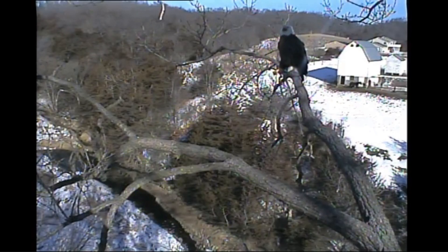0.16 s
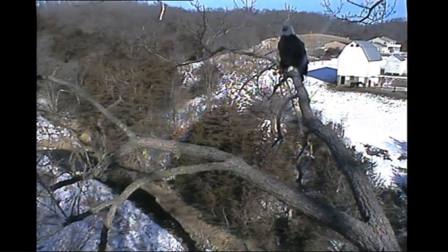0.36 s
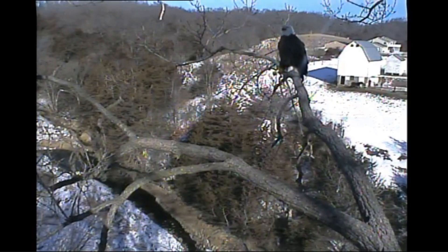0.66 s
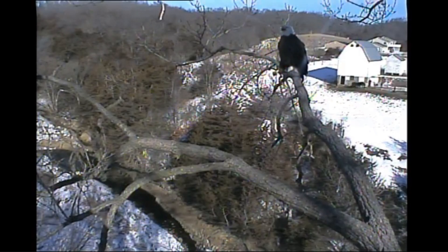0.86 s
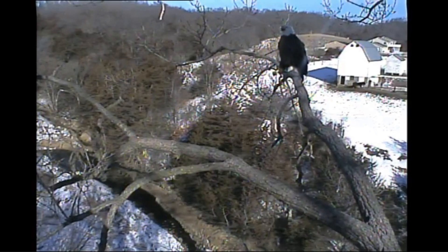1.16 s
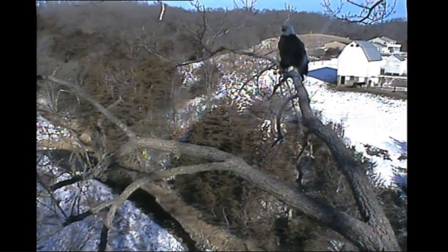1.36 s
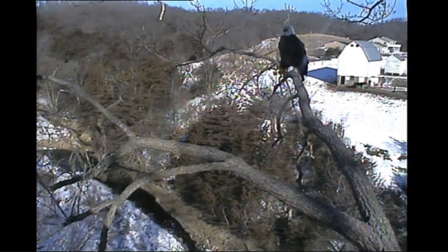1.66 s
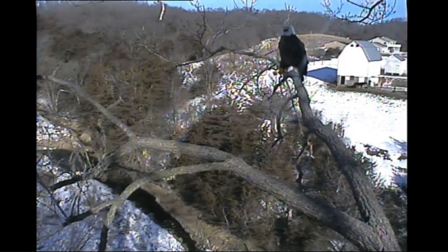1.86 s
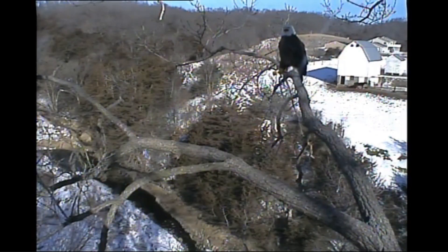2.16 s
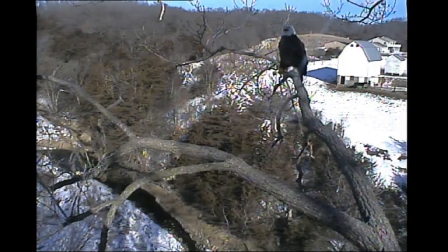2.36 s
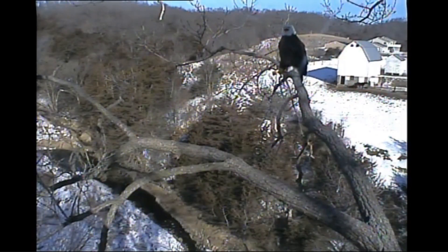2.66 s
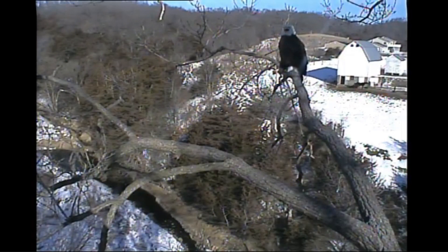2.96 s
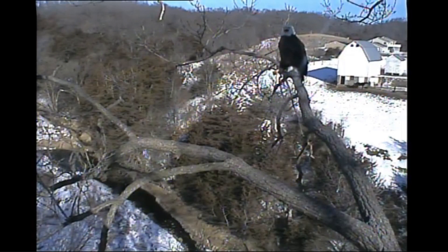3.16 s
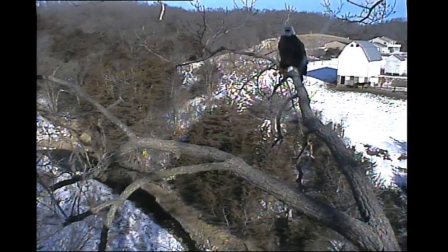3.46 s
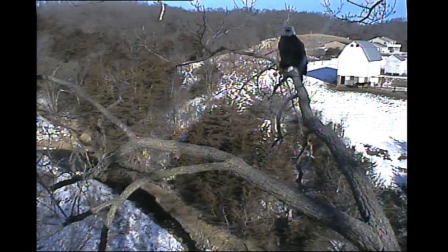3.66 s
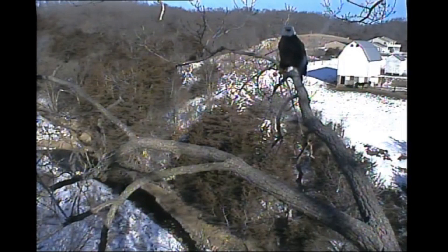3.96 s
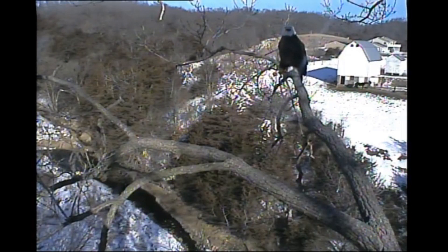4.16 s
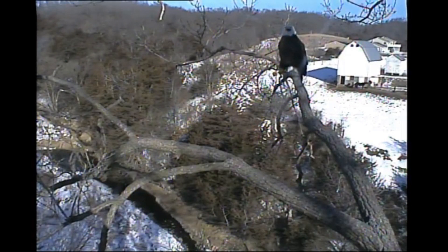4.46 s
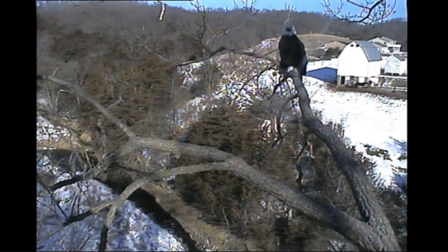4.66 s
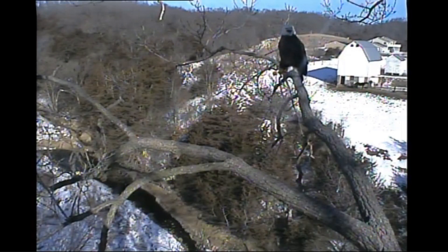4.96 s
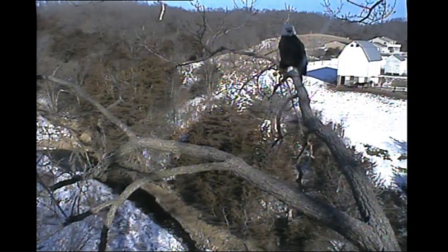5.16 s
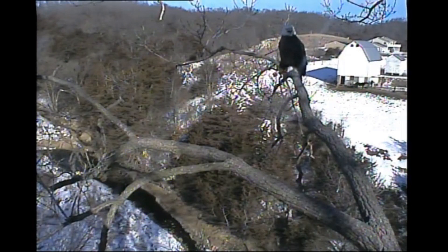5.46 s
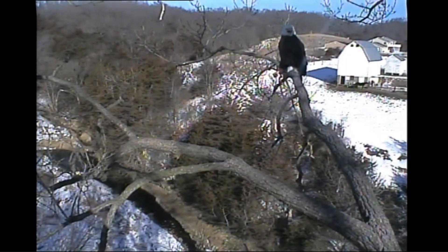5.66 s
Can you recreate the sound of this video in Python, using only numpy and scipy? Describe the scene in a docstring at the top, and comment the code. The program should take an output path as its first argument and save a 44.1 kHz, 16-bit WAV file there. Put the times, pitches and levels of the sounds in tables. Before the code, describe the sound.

An eagle pipes three quick, falling series of shrill notes over a faint outdoor rush and electrical buzz.

```python
"""Eagle on a high branch.

Three falling series of piping notes, with soft whines, peeps and twig ticks between them.
In the forced notes the voice flips between registers; the tree and the wooded valley answer.
A nest camera's microphone overloads on the notes and adds mains buzz and a thin whistle
to the far rush of the valley."""
import sys
import numpy as np
from scipy import signal
from scipy.fft import rfft, irfft, next_fast_len
from scipy.io import wavfile
from scipy.ndimage import uniform_filter1d, map_coordinates

SR = 44100
rng = np.random.default_rng(int(sys.argv[2]) if len(sys.argv) > 2 else 0)


def generate_wav(sig):
    """Save sig (samples, or channels by samples) to the path in sys.argv[1] as 16-bit PCM at SR."""
    pcm = np.round(np.clip(np.atleast_2d(sig).T, -1, 1) * 32767).astype(np.int16)
    wavfile.write(sys.argv[1], SR, pcm)


N = 255780

# plain low piping notes: start_s, length_s, fade_s, pitch_hz, level_db, rasp_db
PLAIN_NOTES = [(0.0, .009, .004, 3260, -18, -37), (.067, .013, .005, 3230, -17, -43),
               (1.003, .027, .016, 3550, -10, -28), (1.438, .034, .016, 3470, -6.5, -21.5),
               (1.545, .025, .007, 3390, -7.5, -23), (1.652, .013, .009, 3210, -8, -31),
               (3.144, .032, .008, 3380, -9, -26), (3.267, .02, .009, 3240, -8, -26),
               (3.382, .014, .01, 3190, -8, -31), (4.975, .036, 0, 3320, -9, -24),
               (5.11, .02, .01, 3230, -9, -25), (5.249, .014, .007, 3160, -8, -30),
               (5.377, .015, 0, 3060, -9, -30)]
# forced notes that flip between registers:
# start_s, flipping_s, hold_s, drop_s, fade_s, held_hz, level_db, rasp_db, squeal_db
FORCED_NOTES = [(1.1, .032, .017, 0, 0, 4360, -7, -21.5, -12),
                (1.209, .034, .017, 0, 0, 4360, -6, -21, -12),
                (1.322, .02, .018, 0, 0, 4480, -6.5, -22, -13),
                (2.665, .006, .032, .013, 0, 4260, -6.5, -23.5, -18),
                (2.78, .034, .018, 0, 0, 4310, -6, -21.5, -10),
                (2.899, .02, .017, 0, .014, 4440, -5.5, -21.5, -12),
                (3.018, .005, .016, .017, .022, 4340, -7, -22.5, -17),
                (4.466, .022, .035, 0, 0, 4120, -8.5, -27, -22),
                (4.589, .033, .018, 0, 0, 4290, -5.5, -21, -8),
                (4.713, .019, .019, .014, 0, 4440, -6, -22, -14),
                (4.845, .004, .017, .016, .009, 4330, -6, -22.5, -18)]
# rasp of the voice: freq_hz, density_db
RASP_SPECTRUM = [(40, 11.5), (130, 6.5), (500, 10.5), (1200, 2.5), (2500, 3.5), (4000, 15), (5500, -1),
                 (6900, 12), (7800, 1)]
# echoes off near limbs and the ground: delay_s, t60_s, level_db
NEAR_ECHOES = [(.004, 0.036, -15), (.06, 0.1, -36.5)]
# decay of the woods' echo: freq_hz, t60_s
WOODS_DECAY = [(200, 0.33), (3200, 0.48), (4500, 0.45), (7000, 0.18)]
# colour of the woods' echo: freq_hz, gain_db
WOODS_COLOUR = [(300, -37), (2500, 2), (3150, -1), (3550, 4.5), (4300, -6), (4900, 7), (5500, -13.5),
                (7500, 3.5)]
# soft falling whines: start_s, length_s, start_hz, end_hz, level_db, tilt_db_per_overtone
WHINE_NOTES = [(0, .085, 750, 640, -35.5, -.5), (.6, .37, 935, 660, -38.5, .5),
               (1.8, .33, 950, 660, -38.5, 0), (5.36, .33, 815, 585, -43, -1.5)]
# throat resonances: freq_hz, gain_db
THROAT_COLOUR = [(600, -10), (860, -2), (1200, -16), (1700, -11), (2200, -11), (2750, 1), (3400, -3),
                 (4200, -16), (5200, -16), (6500, -28)]
# far wind and traffic: freq_hz, density_db
VALLEY_SPECTRUM = [(25, -9), (70, -3), (140, -10.5), (280, -3), (520, -1), (800, -4), (1200, -13),
                   (1800, -21), (2700, -21), (3800, -21.5), (5200, -24), (7800, -26)]
# colour of the mains spikes: freq_hz, gain_db
BUZZ_COLOUR = [(200, -44), (1500, -15), (4000, -9), (6200, 9.5), (7800, -14.5)]
# twig cracks: start_s, level_db
TWIG_TICKS = [(.121, -35), (2.283, -23.5), (4.451, -31), (5.535, -35)]
# faint husky peeps: start_s, length_s, pitch_hz, level_db
PEEP_NOTES = [(0.194, 0.073, 3800, -54), (0.592, 0.043, 4040, -48.5), (1.743, 0.016, 3110, -41),
              (2.413, 0.075, 3700, -55), (2.59, 0.038, 3430, -46), (3.787, 0.048, 3840, -57),
              (3.826, 0.028, 3200, -53.5), (4.15, 0.051, 4160, -48.5), (4.283, 0.067, 3650, -52.5),
              (4.392, 0.019, 1310, -43), (5.752, 0.012, 1160, -39.5)]

FADE_DB, FADE_RASP_DB = -8, -22.5  # soft end of a note, relative to its tone and rasp


def amp(db):
    """Decibels to gain."""
    return 10 ** (np.asarray(db) / 20)


def unit(x):
    """Scale to rms 1."""
    return x / np.sqrt(np.mean(x ** 2) + 1e-20)


def along(points, hz):
    """Read (freq_hz, value) points on a log axis."""
    freq_hz, values = np.transpose(points)
    return np.interp(np.log(hz + 1), np.log(freq_hz + 1), values)


def filtered(x, response):
    """Apply a frequency response."""
    size = next_fast_len(N + SR // 2)
    return irfft(rfft(x, size) * response(np.fft.rfftfreq(size, 1 / SR)), size)[:N]


def coloured(x, spectrum):
    """x shaped by a spectrum, rms 1."""
    return unit(filtered(x, lambda hz: amp(along(spectrum, hz))))


def noise(spectrum):
    """Coloured noise, rms 1."""
    return coloured(rng.standard_normal(N), spectrum)


def wobble(rate_hz):
    """Smooth random curve, rate_hz knots a second."""
    knots = rng.standard_normal(int(N * rate_hz / SR) + 4)
    return map_coordinates(knots, [np.arange(N) * rate_hz / SR])


def smooth(x, width_s):
    """Round the corners of a control."""
    size = max(1, int(width_s * SR))
    return uniform_filter1d(uniform_filter1d(x, size), size)


def phase_of(hz):
    """Running phase of a pitch curve."""
    return 2 * np.pi * np.cumsum(hz) / SR


def span(start_s, length_s):
    """Sample indices of an event, and its course u from -1 to 1."""
    at = np.arange(max(0, int(start_s * SR)), min(N, int((start_s + length_s) * SR)))
    return at, np.linspace(-1, 1, len(at))


def held_tone(start_s, length_s, hz, db, rasp_db, sag_per_s=0, arch_s=.018):
    """A held tone breaks into equal pitch arches: start_s, length_s, pitch_hz, level_db, rasp_db."""
    count = max(1, round(length_s / arch_s))
    step_s = length_s / count
    return [(start_s + k * step_s, step_s, hz * (1 - sag_per_s * step_s * (k - (count - 1) / 2)),
             db, rasp_db) for k in range(count)]


def plain_note(start_s, length_s, fade_s, hz, db, rasp_db, catch_s=.0035, catch_db=-17, sag_per_s=1.3):
    """Low register: a catch, a sagging tone, a soft end."""
    catch = (start_s, catch_s, hz * 1.1, db + catch_db, rasp_db + catch_db / 2)
    hold = held_tone(start_s + catch_s, length_s - catch_s, hz, db, rasp_db, sag_per_s)
    end_hz = hz * (1 - sag_per_s * length_s / 2)
    fade = (start_s + length_s, fade_s, end_hz, db + FADE_DB, rasp_db + FADE_RASP_DB)
    return [catch, *hold, fade]


def forced_note(start_s, flipping_s, hold_s, drop_s, fade_s, hz, db, rasp_db, squeal_db,
                onset_s=.0055, flip_s=.014, high_ratio=1.24, low_hz=3416):
    """A squeal, flips between middle and high registers, a held tone, sometimes a drop to the low one."""
    flips = max(0, round((flipping_s - onset_s) / flip_s))
    squeal_s = onset_s if flips else flipping_s
    squeal_hz = 5270 + 349.1 * flips  # more flips, forced higher
    burst_db = rasp_db + 6 + .7 * (squeal_db - db)
    arches = [(start_s, squeal_s, squeal_hz, squeal_db, burst_db)]
    for k, (early, sharp) in enumerate(rng.standard_normal((flips, 2))):
        period_s = (flipping_s - squeal_s) / flips
        at_s = start_s + squeal_s + k * period_s
        middle_s = period_s * np.clip(1 - .32 * flips - .08 * early, .25, .75)
        high_hz = hz * high_ratio * (1 + .03 * sharp)
        arches.append((at_s, middle_s, hz, db, rasp_db))
        arches.append((at_s + middle_s, period_s - middle_s, high_hz, db - 1, rasp_db))
    hold = held_tone(start_s + flipping_s, hold_s, hz, db, rasp_db)
    end_s = start_s + flipping_s + hold_s
    drop = (end_s, drop_s, low_hz, db, rasp_db)
    fade = (end_s + drop_s, fade_s, low_hz, db + FADE_DB, rasp_db + FADE_RASP_DB)
    return [*arches, *hold, drop, fade]


def note_arches(shortest_s=.003):
    """Arches of all notes; the shortest do not sound."""
    notes = [forced_note(*row) for row in FORCED_NOTES] + [plain_note(*row) for row in PLAIN_NOTES]
    return [arch for note in notes for arch in note if arch[1] > shortest_s]


def piping(shimmer_db=3.5, crown_db=5, octave_db=-19, rasp_gain_db=7, lead_s=.007, lead_db=-16):
    """A whistle that arches in each register, tears where it flips and rasps as it is forced."""
    pitch_hz, level, rasp_level, tear = np.zeros((4, N))
    for start_s, length_s, hz, db, rasp_db in note_arches():
        at, u = span(start_s, length_s + .001)
        forced = np.interp(hz, [3500, 4300], [0, 1])
        tear[at] = forced * u ** 6
        if not pitch_hz[at[0] - 1]:  # note onset: rasp leads the tone
            rasp_level[max(0, at[0] - int(lead_s * SR)):at[0]] = amp(rasp_db + lead_db)
            if forced > .5:  # opens torn, at the top, and drops
                u, tear[at] = (u + 1) / 2, 1
        bow = .04 + .11 * forced
        pitch_hz[at] = hz * (1 + bow * (.12 - u ** 2))
        level[at] = amp(db + crown_db * forced * (.84 - u ** 2) + .5 * (1.5 - forced) * u)
        rasp_level[at] = amp(rasp_db)
    voiced = np.flatnonzero(pitch_hz)
    pitch_hz = smooth(np.interp(np.arange(N), voiced, pitch_hz[voiced]), .00046)
    jitter = .08 * tear * wobble(3000) + .012 * wobble(1000)
    phase = phase_of(pitch_hz * (1 + jitter))
    tone = (np.sin(phase) + amp(octave_db) * np.sin(2 * phase)) * amp(shimmer_db * wobble(400))
    rasp = amp(rasp_gain_db + 4 * wobble(300)) * noise(RASP_SPECTRUM)
    return smooth(level, .0019) * tone + smooth(rasp_level, .0012) * rasp


def scattered(x, delay_s, t60_s):
    """A delayed, decaying scatter of copies; t60_s is a function of frequency."""
    hz, t, bins = signal.stft(rng.standard_normal(SR // 2), SR, nperseg=256)
    tail = signal.istft(bins * amp(-60 * t / t60_s(hz[:, None])), SR, nperseg=256)[1]
    response = np.pad(tail / np.linalg.norm(tail), (int(delay_s * SR), 0))
    return signal.fftconvolve(x, response)[:N]


def echoes(x, woods_db=-26, woods_delay_s=.017, patchy_db=3.5):
    """Limbs and ground throw back quick scatters, the woods a longer, uneven tail."""
    near = sum(amp(db) * scattered(x, delay_s, lambda hz: t60_s) for delay_s, t60_s, db in NEAR_ECHOES)
    woods = scattered(x, woods_delay_s, lambda hz: along(WOODS_DECAY, hz))
    woods = filtered(woods, lambda hz: amp(along(WOODS_COLOUR, hz)))
    return near + amp(woods_db + patchy_db * wobble(35)) * woods


def whines(gain_db=-3, husk_db=-5, swell_db=2.5, flutter_db=4, attack_share=.33, release_share=.26):
    """A weak, husky voice swells and slides down through the throat's resonances; overtones flutter."""
    out = np.zeros(N)
    waver = 1 + .014 * wobble(140)
    husk = amp(husk_db) * noise(THROAT_COLOUR)
    flutter = {k: amp(flutter_db * wobble(24.72)) for k in range(1, 9)}
    for start_s, length_s, start_hz, end_hz, db, tilt_db in WHINE_NOTES:
        at, u = span(start_s, length_s)
        done = (u + 1) / 2
        slide = np.sin(np.pi / 2 * done ** 1.3) ** 2
        hz = (start_hz + (end_hz - start_hz) * slide) * waver[at]
        envelope = np.minimum(1, np.minimum(done / attack_share, (1 - done) / release_share))
        voice = sum(gain[at] * amp(along(THROAT_COLOUR, k * hz) + tilt_db * k) * np.sin(k * phase_of(hz))
                    for k, gain in flutter.items())
        out[at] += envelope * amp(gain_db + db + swell_db * u / 2) * (unit(voice) + husk[at])
    return out


def valley(rush_db=-40):
    """Far wind and traffic, swelling a little."""
    swell_db = .4 * wobble(2) + .6 * wobble(10)
    return amp(rush_db + swell_db) * noise(VALLEY_SPECTRUM)


def electronics(mains_hz=59.95, buzz_db=-56, hum_db=-56, whistle_db=-57, whistle_hz=4619):
    """A spike on every half cycle of the mains, its hum and a thin steady whistle."""
    spikes = np.zeros(N)
    at = (np.arange(.0015, N / SR - .01, 1 / (2 * mains_hz)) * SR).astype(int)
    spikes[at] = amp(3.5 * rng.standard_normal(len(at)))
    buzz = coloured(spikes, BUZZ_COLOUR)
    hum = unit(np.sin(2 * np.pi * mains_hz * np.arange(N) / SR))
    whistle = unit(np.sin(phase_of(whistle_hz + 5 * wobble(45))))
    return amp(buzz_db) * buzz + amp(hum_db) * hum + amp(whistle_db) * whistle


def twigs(t60_s=.009):
    """Dry little cracks in the branches."""
    level = np.zeros(N)
    for start_s, db in TWIG_TICKS:
        at, _ = span(start_s, t60_s)
        level[at] += amp(db - 60 * (at - at[0]) / SR / t60_s)
    return level * noise([(200, 1), (1200, 11), (3000, -23), (7000, -5)])  # freq_hz, density_db


def peeps(bow=.21, jitter=.092):
    """Short unsteady arches of the eagle's whistle, barely voiced."""
    out = np.zeros(N)
    waver = 1 + jitter * wobble(1400)
    for start_s, length_s, hz, db in PEEP_NOTES:
        at, u = span(start_s, length_s)
        pitch_hz = hz * (1 + bow * (.2 - u ** 2)) * waver[at]
        out[at] += amp(db) * unit((1 - u ** 2) * np.sin(phase_of(pitch_hz)))
    return out


def scene():
    """The eagle close by, the valley behind."""
    calls = piping()
    return (calls + echoes(calls) + whines() + peeps() + twigs() + valley() + electronics())[None]


def upsampled(x, from_hz, to_hz):
    """Linear interpolation; mirrors each tone faintly into the treble."""
    return np.interp(np.arange(N * to_hz // SR) * from_hz / to_hz, np.arange(len(x)), x)


def record(dry, clip_level=.3, hardness=7.4, asymmetry=.1, camera_hz=16000, stream_hz=22050,
           band_hz=(60, 7880), cutoff_hz=15780):
    """The camera overloads at its low sample rate; clipping overtones fold down under the notes."""
    x = signal.resample_poly(dry[0], camera_hz, SR, window=("kaiser", 2))
    ceiling = clip_level * (1 + asymmetry * np.sign(x))  # one side clips first: even overtones
    distortion = x / (1 + np.abs(x / ceiling) ** hardness) ** (1 / hardness) - x
    x = x + distortion - uniform_filter1d(distortion, size=120)  # coupling blocks the offset
    x = signal.sosfilt(signal.butter(2, band_hz, "bandpass", fs=camera_hz, output="sos"), x)
    x = upsampled(upsampled(x, camera_hz, stream_hz), stream_hz, SR)
    return filtered(x, lambda hz: hz < cutoff_hz)[None]


dry = scene()
out = record(dry)
generate_wav(out)
```